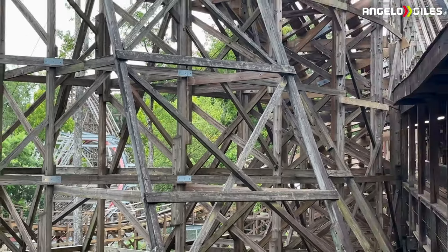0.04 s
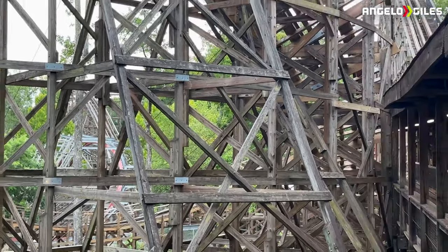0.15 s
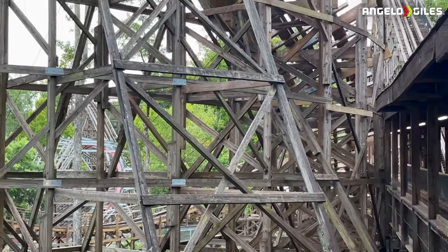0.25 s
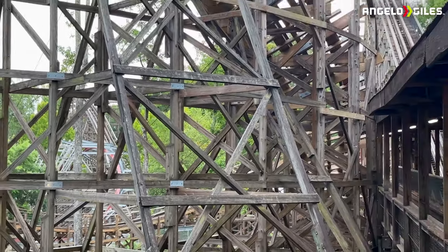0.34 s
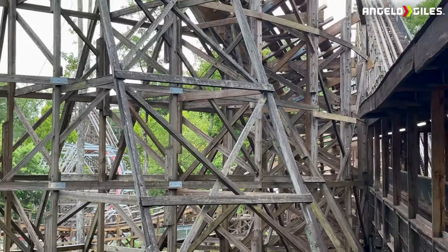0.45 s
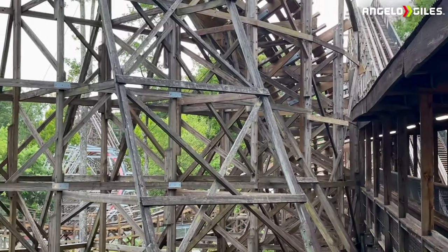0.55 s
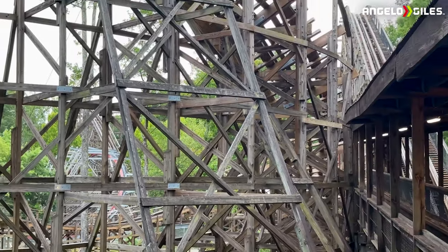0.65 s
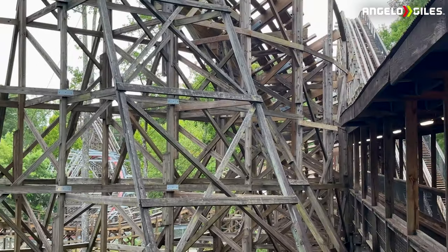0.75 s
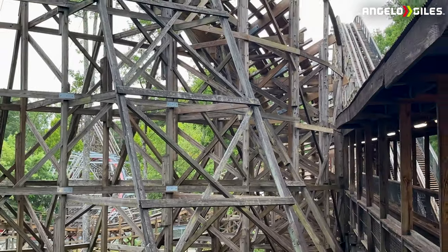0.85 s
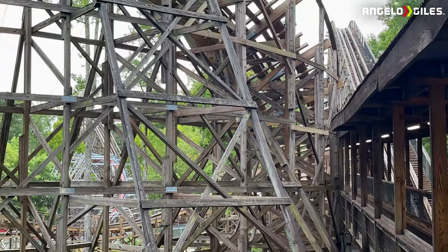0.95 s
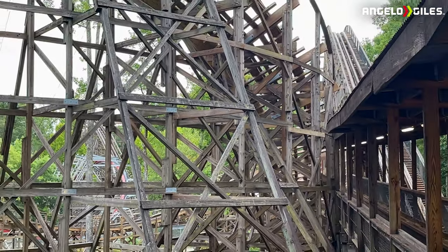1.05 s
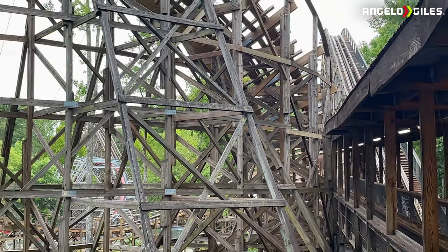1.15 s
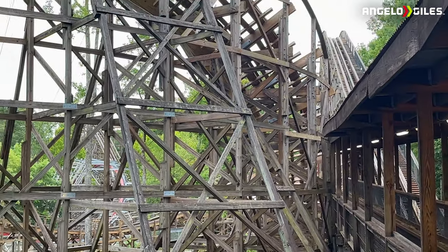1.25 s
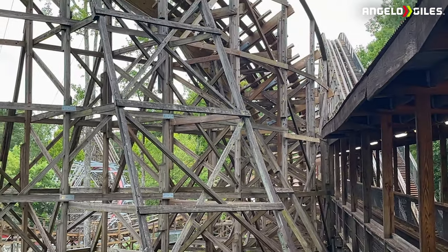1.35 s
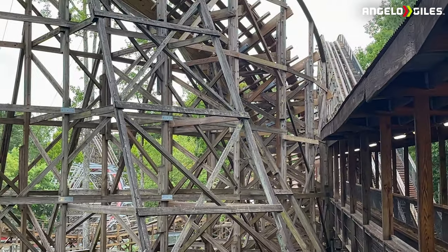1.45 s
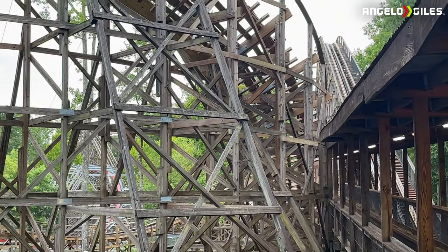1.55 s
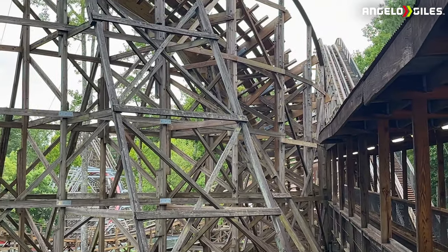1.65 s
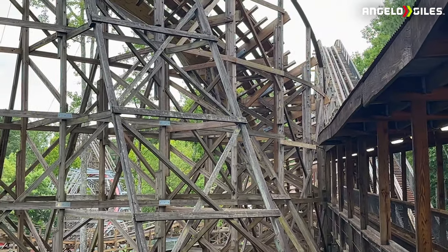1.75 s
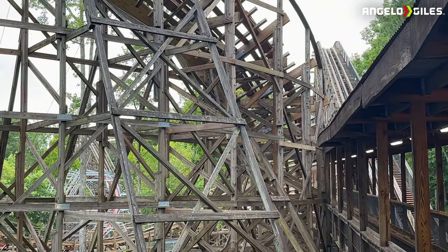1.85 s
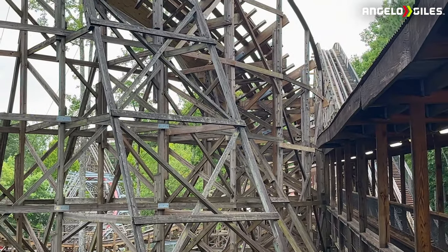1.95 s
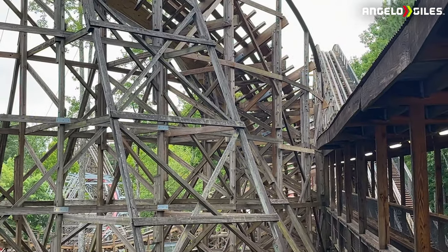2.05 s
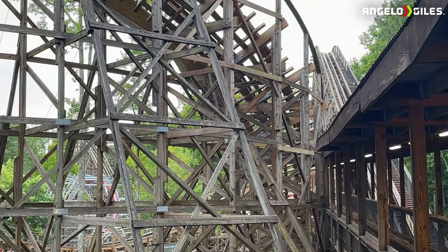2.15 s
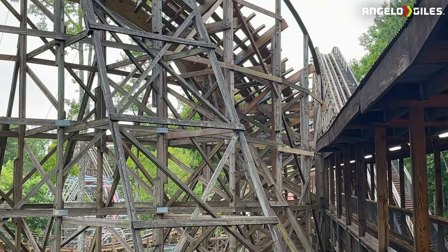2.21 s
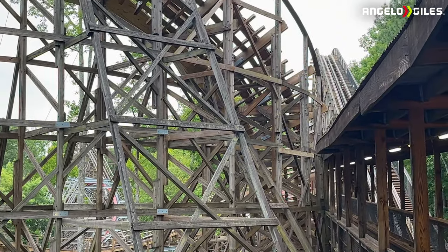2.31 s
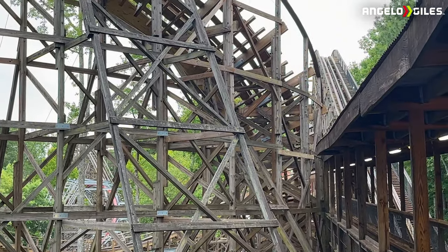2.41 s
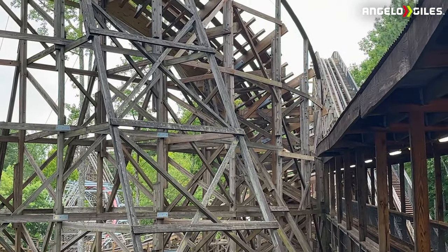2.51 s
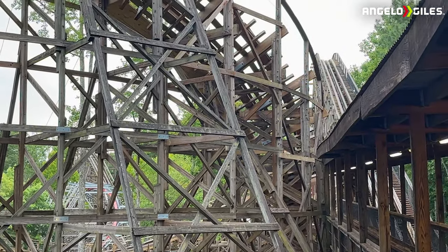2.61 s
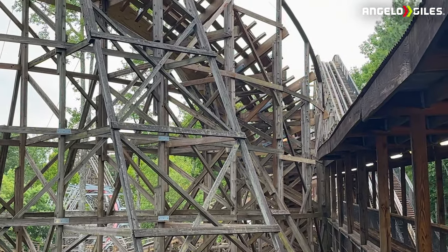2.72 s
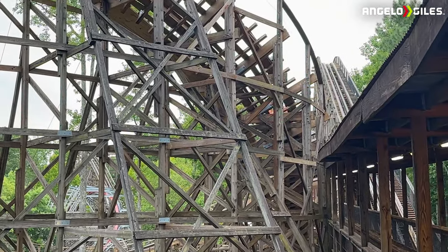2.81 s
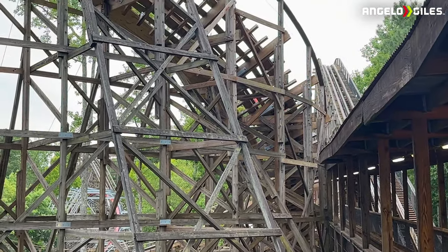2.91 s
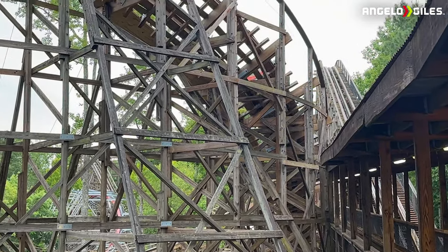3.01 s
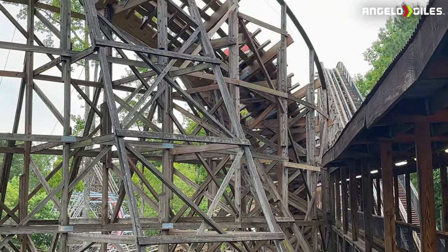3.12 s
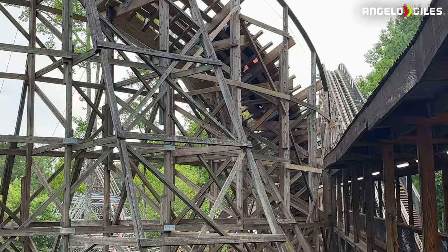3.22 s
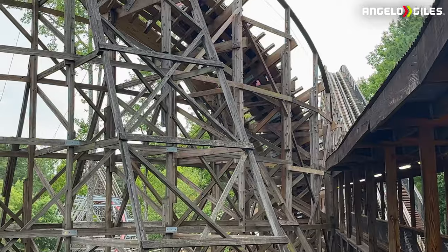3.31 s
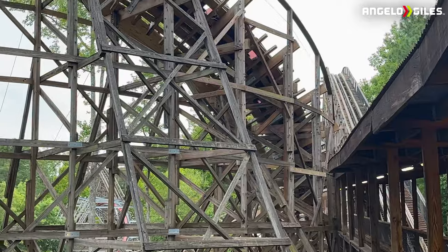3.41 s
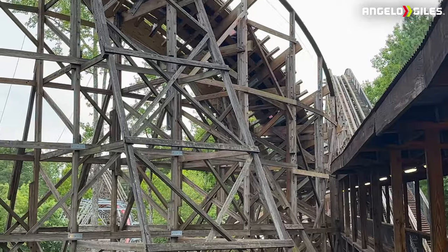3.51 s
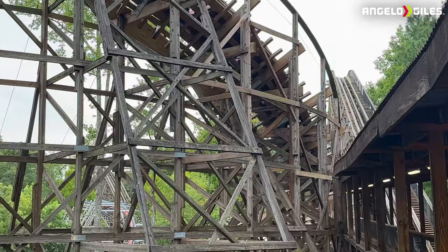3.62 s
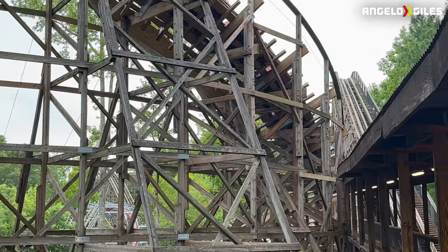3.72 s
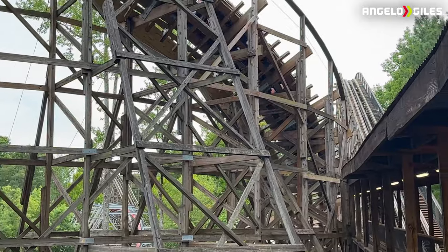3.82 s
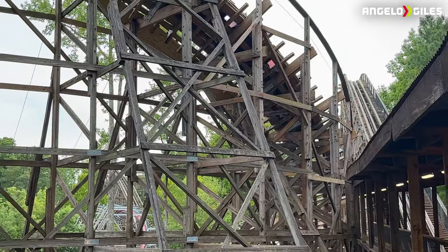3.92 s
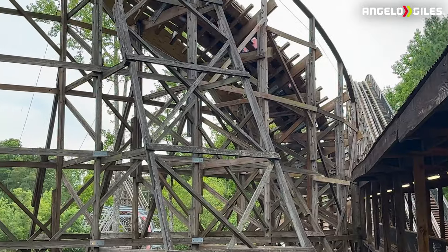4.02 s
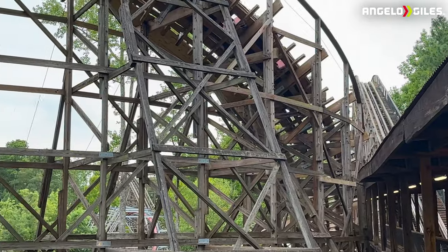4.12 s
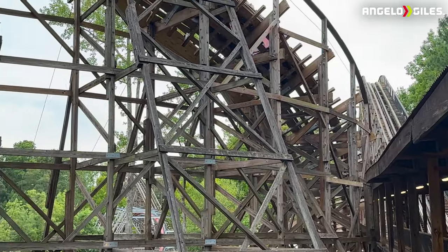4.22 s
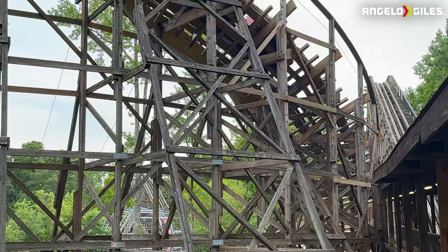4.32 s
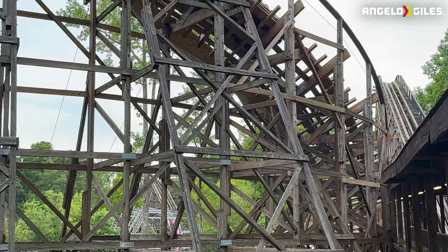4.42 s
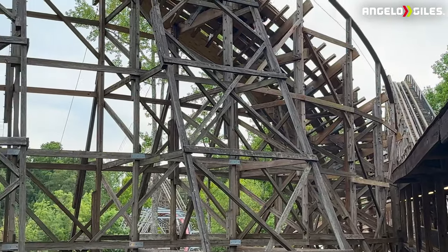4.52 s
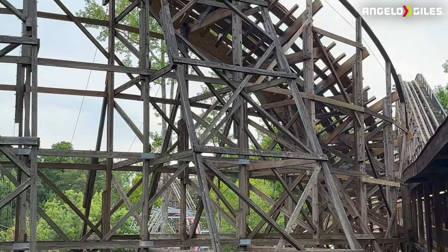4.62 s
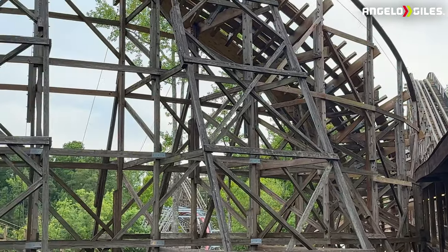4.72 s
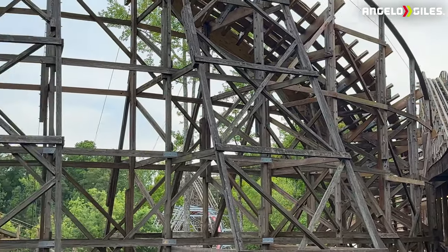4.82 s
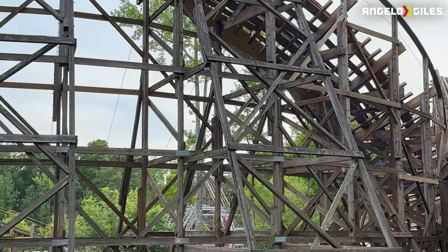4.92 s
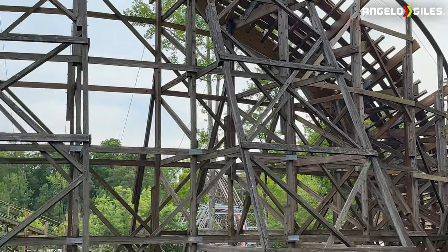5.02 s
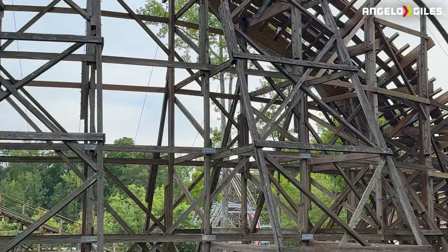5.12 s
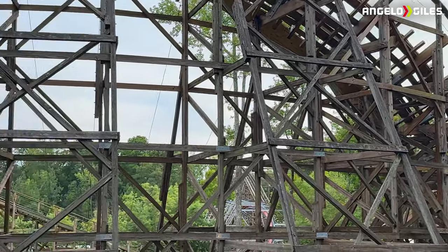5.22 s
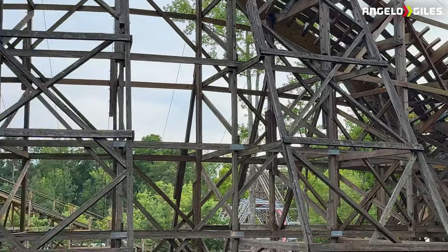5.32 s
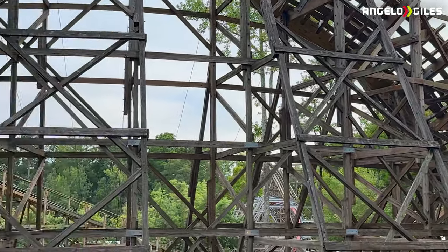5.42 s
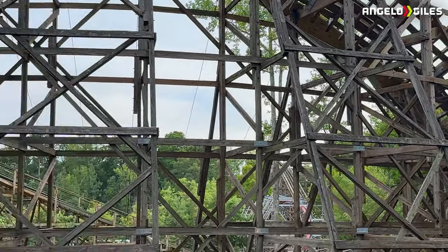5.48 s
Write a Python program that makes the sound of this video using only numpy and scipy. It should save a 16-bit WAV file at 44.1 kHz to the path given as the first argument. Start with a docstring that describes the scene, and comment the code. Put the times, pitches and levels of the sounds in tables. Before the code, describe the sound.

A roller coaster train rolls through a timber structure at an amusement park, heard from close by. Its deep rumble rises out of a soft background wash and a steady buzzing motor, growing into a bright roar with hollow wooden knocks. At the peak the wheels clatter sharply and squeal in brief bursts. The roar then falls back, with more thuds from the beams as the train moves away.

```python
"""A roller coaster train passes through a timber trestle. Rough steel wheels roar and hiss on the rails,
clack over the joints and squeal as their flanges rub in the bend; the shaken beams boom and thud.
A motor buzzes nearby over the low wash of the park. A phone follows the train,
and the stereo width varies with frequency."""
import sys
import numpy as np
from scipy import signal
from scipy.fft import rfft, irfft, next_fast_len
from scipy.io import wavfile
from scipy.ndimage import uniform_filter1d, map_coordinates

SR = 44100
rng = np.random.default_rng(int(sys.argv[2]) if len(sys.argv) > 2 else 0)


def inscribe(sig):
    """Save sig as 16-bit PCM at rate SR to the path in sys.argv[1].

    A 1-D sig is mono; a 2-D sig holds one channel per row.
    Samples are clipped to [-1, 1] before scaling.
    """
    pcm = np.round(np.clip(np.atleast_2d(sig).T, -1, 1) * 32767)
    wavfile.write(sys.argv[1], SR, pcm.astype(np.int16))


N = 244755
TIME = np.arange(N) / SR


def amp(db):
    return 10 ** (np.asarray(db) / 20)


def unit(x):
    return x / np.sqrt(np.mean(x ** 2) + 1e-20)


def along(points, hz, column=1):
    """One column of a table read on a log frequency axis."""
    table = np.transpose(points)
    return np.interp(np.log(hz + 1), np.log(table[0] + 1), table[column])


def curves(rows):
    """Automation: one value per sample for each column after the time."""
    times, *columns = np.transpose(rows)
    return [np.interp(TIME, times, column) for column in columns]


def wobble(rate):
    """A smooth random modulator, rate knots a second."""
    return map_coordinates(rng.standard_normal(int(N * rate / SR) + 4), [TIME * rate])


def filtered(x, response):
    """x through an EQ given as a complex response of frequency."""
    size = next_fast_len(N + 8192)
    return irfft(rfft(x, size) * response(np.fft.rfftfreq(size, 1 / SR)), size)[..., :N]


def rush(spectrum, patchy_db):
    """Two unrelated noises (direct and scattered sound) of rms 1, sharing patches of random gain."""
    bins = signal.stft(rng.standard_normal((2, N)), nperseg=512)[2]
    patches = uniform_filter1d(uniform_filter1d(rng.standard_normal(bins.shape[1:]), 6, 0), 10, 1)
    pair = signal.istft(bins * amp(patchy_db * unit(patches)), nperseg=512)[1][:, :N]
    low_hz, high_hz = spectrum[0][0], spectrum[-1][0]
    return unit(filtered(pair, lambda hz: amp(along(spectrum, hz)) * (hz > low_hz) * (hz < high_hz)))


# EQ of the park's deep bass and of its broad wash: f/Hz, level/dB
BASS_EQ = [(18, -40), (32, 0), (45, -12.5), (65, 2), (90, 3), (140, 1.5), (190, -7), (300, -23)]
WASH_EQ = [(90, -42), (200, -1.5), (450, -2.5), (900, -9), (1800, -15), (3500, -22), (7000, -26),
           (11000, -30.5), (13000, -37), (16000, -30)]
# Their fader rides: t/s, level/dB
BASS_LEVEL = [(0, -29), (.8, -27), (1.4, -32), (2, -28), (2.6, -28), (3.4, -26), (4.2, -31.5), (5.55, -35)]
WASH_LEVEL = [(0, -30), (.25, -30), (.5, -31.5), (1, -31), (3, -33), (5.55, -30.5)]
def park():
    """Distant rides, traffic and trees blur into a low bed."""
    bass = amp(curves(BASS_LEVEL)[0]) * rush(BASS_EQ, patchy_db=-0.8)
    wash = amp(curves(WASH_LEVEL)[0] + 0.21 * wobble(6.4)) * rush(WASH_EQ, patchy_db=0.6)
    return bass + wash


# Resonances of the motor casing: f/Hz, level/dB
CASING_EQ = [(50, 16), (120, -21), (300, -3.5), (440, -6), (528, 0), (600, -16), (704, 1), (790, 0.5),
             (900, -6.5), (1400, -8), (3000, -26), (6000, -48)]
# Hum lines: f/Hz, relative level/dB
HUM_LINES = [(88, -39.5), (118.5, -38), (147, -39)]
def motor(turn_hz=58.68):
    """A sharp pulse and a weaker one half a turn later ring the casing, over wavering hum lines."""
    turns = turn_hz * TIME + 0.013 * wobble(2.98)
    pulses = np.diff(np.floor(turns), prepend=0) + 0.36 * np.diff(np.floor(turns + .5), prepend=0)
    pulses *= amp(2.3 * wobble(30))
    buzz = unit(filtered(pulses, lambda hz: amp(along(CASING_EQ, hz)) * (hz > 40)))
    hum = 0
    for hz, db in HUM_LINES:
        gain = amp(db + 0.5 + 3.2 * wobble(5.19))
        hum += gain * np.sin(2 * np.pi * (hz * TIME + 0.16 * wobble(5)))
    return (amp(-38.5 + 1.1 * wobble(2.8)) * buzz + hum) * [[1], [.7]]


# Hollow timber hits under and behind the train: t/s, f/Hz, level/dB
THUDS = [(1.7, 320, -22), (2.05, 310, -19), (2.11, 315, -18), (2.265, 130, -17), (2.6, 290, -17),
         (2.73, 500, -19), (2.88, 115, -17), (3.365, 250, -15), (3.46, 255, -15), (3.49, 415, -16),
         (4.77, 385, -17), (4.805, 330, -18), (4.952, 310, -12), (5.015, 185, -14), (5.17, 180, -18),
         (5.185, 310, -19), (5.245, 345, -16), (5.3, 330, -20), (5.37, 300, -19), (5.39, 365, -18),
         (5.465, 160, -14), (5.525, 320, -16)]
def thuds(attack_s=.009, t60_s=.19):
    """Each thud is the soft, quickly damped ring of a beam."""
    out, t = np.zeros((2, N + SR)), np.arange(SR // 4) / SR
    for (start, hz, db), phase in zip(THUDS, rng.random((len(THUDS), 2, 1))):
        envelope = amp(db - 60 * t / t60_s) * (1 - np.exp(-t / attack_s))
        onset = round(start * SR)
        out[:, onset:onset + len(t)] += envelope * np.sin(2 * np.pi * (hz * t + phase))
    return out[:, :N]


def rubbed_mode(rows, width_hz, tone, attack_db_per_s=220, release_db_per_s=170):
    """A rubbed wheel mode: a gliding line of noise plus some pure tone, and its fluttering gain."""
    start, hold, from_hz, to_hz, db = np.transpose(rows)[:, :, None]
    ramps_db = np.minimum(attack_db_per_s * (TIME - start), release_db_per_s * (start + hold - TIME))
    envelope = amp(db + np.minimum(0, ramps_db)).max(axis=0)
    glide_times = np.hstack([start, start + hold]).ravel()
    pitch_hz = np.interp(TIME, glide_times, np.hstack([from_hz, to_hz]).ravel())
    fuzz = unit(filtered(rng.standard_normal((2, 2, N)), lambda hz: 1 / (1 + (2 * hz / width_hz) ** 3)))
    phase = 2 * np.pi * np.cumsum(pitch_hz + width_hz / 14 * wobble(30)) / SR
    line = unit((fuzz[0] + tone) * np.cos(phase) + fuzz[1] * np.sin(phase))
    return line, envelope * amp(0.48 * wobble(21))


# Squeals on the lowest and the second wheel mode: t/s, hold/s, from f/Hz, to f/Hz, level/dB
LOW_SQUEALS = [(1.61, 0.1, 2270, 2230, -44), (3.618, .035, 1924, 1930, -28), (3.705, 0.04, 1910, 1930, -30),
               (3.79, 0.125, 1940, 1890, -24), (3.974, 0.06, 1990, 1980, -28.5),
               (4.055, 0.06, 1915, 1885, -24.5), (4.13, .045, 1890, 1910, -27.5),
               (4.19, .04, 1870, 1860, -32), (4.362, 0.083, 1950, 1970, -34),
               (4.51, 0.14, 1980, 2010, -28.5), (4.7, .022, 2040, 2030, -26.5),
               (4.775, 0.03, 1960, 1930, -32), (5.121, .12, 1920, 1940, -40)]
HIGH_SQUEALS = [(3.83, .07, 4850, 4810, -36), (3.97, .05, 4860, 4860, -35.5), (4.05, .08, 4860, 4830, -31),
                (4.14, .1, 4860, 4850, -33), (4.27, .03, 4860, 4900, -37), (4.32, .02, 5000, 5000, -41),
                (4.38, .03, 5090, 5100, -43)]
# Top wheel modes: f/Hz, width/Hz, relative level/dB
TOP_MODES = [(8450, 220, -2), (12300, 1000, 0)]
def squeal():
    """Flanges rub the rail; the wheel's top modes add a sheen whenever the second one sounds."""
    low, low_gain = rubbed_mode(LOW_SQUEALS, width_hz=170, tone=.75)
    high, high_gain = rubbed_mode(HIGH_SQUEALS, width_hz=310, tone=0)
    peaks = lambda f: sum(amp(db) / (1 + abs(2 * (f - hz) / width) ** 3) for hz, width, db in TOP_MODES)
    sheen = unit(filtered(rng.standard_normal((2, N)), peaks))
    return low_gain * low + high_gain * (high + amp(-18) * sheen)


# The hardest wheel hits on rail joints: t/s, level/dB
HARD_CLACKS = [(2.8512, -34), (2.9345, -28), (2.9869, -27), (3.105, -24), (3.345, -24), (3.4194, -20),
               (3.5002, -30), (3.5451, -19), (3.5816, -25), (3.6215, -21), (3.6599, -18), (3.7452, -23),
               (3.827, -20), (3.9715, -24), (4.0016, -22), (4.041, -23), (4.1906, -26), (4.2226, -23),
               (4.7918, -33), (5.1779, -30)]
def clacks(roar_db, axle_gap_s=.0815, attack_s=0.0028, t60_s=0.091):
    """Joints give blurred bursts of rail hiss; axle after axle ticks softly between the hard hits."""
    envelope, t = np.zeros(N + SR), np.arange(SR // 10) / SR
    time_jitter, level_jitter = rng.standard_normal((2, 100))
    soft_times = np.clip(1 + axle_gap_s * np.arange(100) + 0.012 * time_jitter, 0, N / SR)
    soft_db = np.interp(soft_times, TIME, roar_db) - 10.5 + 2.5 * level_jitter
    for start, db in [*HARD_CLACKS, *zip(soft_times, soft_db)]:
        envelope[round(start * SR):][:len(t)] += amp(db - 60 * t / t60_s) * (1 - np.exp(-t / attack_s))
    return envelope[:N] * rush(HISS_EQ, patchy_db=2.5)


# Body of the timber trestle: f/Hz, level/dB
BEAM_EQ = [(30, -38), (70, -33), (105, -26), (120, -0.5), (138, -3), (180, -1), (240, -1.5), (330, -0.5),
           (430, -1.5), (540, -7), (900, -17.5)]
# Low-shelf ride, how far the long beams stand out: t/s, level/dB
LONG_BEAM_LEVEL = [(1, 3), (1.5, -1), (2.1, 0), (2.6, 0.5), (3, -1), (3.3, -4.5), (3.7, 1), (4.2, 0),
                   (4.7, 4.5), (5.55, 1)]
def trestle_boom(boom_db, shelf_hz=215):
    """The rolling train shakes the beams into a boom; the long ones carry its low end."""
    boom = amp(boom_db + 0.42 * wobble(5.38)) * rush(BEAM_EQ, patchy_db=-0.77)
    low_end = filtered(boom, lambda hz: 1 / (1 + (hz / shelf_hz) ** 6))
    return boom + (amp(curves(LONG_BEAM_LEVEL)[0]) - 1) * low_end


# EQ of the wheel roar, the rail hiss and the sizzle on top: f/Hz, level/dB
ROAR_EQ = [(220, -14), (400, -12), (490, 0), (620, -1), (900, -0.5), (1300, -6), (2500, -13), (4000, -21.5),
           (6500, -34)]
HISS_EQ = [(1200, -7), (2600, -1), (4000, -5.5), (5500, -9.5), (8000, -13), (10000, -17), (16000, -33)]
SIZZLE_EQ = [(6000, -31), (9000, -5), (10200, 1.5), (11300, 6.5), (12500, 2), (14000, 0.5), (16000, -2)]
# Fader ride of the sizzle: t/s, level/dB
SIZZLE_LEVEL = [(1.5, -68), (2.5, -60), (2.75, -51), (3.1, -46.5), (3.55, -36.5), (3.75, -41.5),
                (3.95, -42), (4.1, -43), (4.3, -43.5), (4.7, -50), (5.55, -55)]
def rolling_wheels(roar_db, nearest_roar_db=-18.5, nearest_hiss_db=-27):
    """Rough wheels on rough rails roar, hiss and sizzle; loose parts shake all three together."""
    hiss_db = nearest_hiss_db + 1.115 * (roar_db - nearest_roar_db)  # brighter up close
    sizzle_db, = curves(SIZZLE_LEVEL)
    shake = wobble(24.28) + .5 * wobble(12)
    roar = amp(roar_db + 0.6 * shake) * rush(ROAR_EQ, patchy_db=0.1)
    hiss = amp(hiss_db + .7 * shake + .4 * wobble(7)) * rush(HISS_EQ, patchy_db=1.1)
    sizzle = amp(sizzle_db + .9 * shake + .8 * wobble(9)) * rush(SIZZLE_EQ, patchy_db=1.6)
    return roar + hiss + sizzle


# Fader rides of the pass-by: t/s, boom level/dB, roar level/dB
PASS_BY = [(0.8, -59, -39.5), (1.1, -42, -43), (1.5, -32, -35), (1.8, -28, -32), (2.1, -24, -30.5),
           (2.5, -23.5, -28), (2.75, -21, -25), (3.1, -20.5, -22), (3.28, -19.5, -20), (3.45, -17.5, -18.5),
           (3.6, -20, -19), (3.75, -20.5, -19), (4.0, -22, -19.5), (4.4, -24, -21.5), (4.8, -26, -23.5),
           (5.15, -26, -26), (5.35, -27, -26), (5.55, -27.5, -29.5)]
def train(fade_in_s=0.72):
    """Timber and steel swell as the train nears and ease off as it leaves."""
    boom_db, roar_db = curves(PASS_BY)
    entry_s = PASS_BY[0][0]
    fade_in = np.interp(TIME, [entry_s - fade_in_s, entry_s], [0, 1])
    return fade_in * (trestle_boom(boom_db) + rolling_wheels(roar_db)) + clacks(roar_db)


# Stereo width by frequency: f/Hz, width/rad (0 is centred, pi is side only)
WIDTH = [(45, 0.12), (140, 0.24), (400, 0.43), (800, 0.68), (1300, 0.51), (2200, 0), (2900, 0.56),
         (4500, 0.58), (5350, 0), (6600, 0), (7300, 1.3), (7900, 3.15), (8550, 3.15), (9500, 1.34),
         (10500, 0.85), (11150, 0), (12900, 0), (13900, 1.24), (15500, 1.94)]
# How much of the side follows the mid: f/Hz, share in phase, share a quarter cycle off
SIDE_TIE = [(60, 0.39, 0), (200, 0.63, -0.24), (500, 0.2, -0.48), (1600, 0.23, -0.53), (2200, 0.056, 0.35),
            (2800, 0, 0.79), (11000, 0.033, .8), (13000, 0, -.6), (16000, 0, -.7)]
def stereo_image(field):
    """Mid/side width by frequency: centred at 5.4-6.6 and 11-13 kHz, side only near 8 kHz."""
    half_angle = lambda hz: np.clip(along(WIDTH, hz), 0, np.pi) / 2
    tied = lambda hz: along(SIDE_TIE, hz) + 1j * along(SIDE_TIE, hz, column=2)
    free = lambda hz: np.sqrt(np.clip(1 - abs(tied(hz)) ** 2, 0, 1))
    mid = filtered(field[0], lambda hz: np.cos(half_angle(hz)))
    side = filtered(field, lambda hz: np.sin(half_angle(hz)) * np.array([tied(hz), free(hz)])).sum(0)
    return np.array([mid + side, mid - side])


# Pan ride: t/s, left-over-right level/dB
PAN = [(0, 0), (2.2, 0), (3.3, -.5), (4.2, -0.3), (4.8, .2), (5.55, .8)]
def phone_turn(pair, shelf_hz=1500):
    """The phone follows the train, tipping the balance of the lows and mids."""
    lean_db, = curves(PAN)
    lows = filtered(pair, lambda hz: 1 / (1 + (hz / shelf_hz) ** 4))
    return pair + (amp([lean_db / 2, -lean_db / 2]) - 1) * lows


def scene():
    """All layers, from park bed to train, spread in stereo and panned."""
    return phone_turn(stereo_image(park() + motor() + thuds() + squeal() + train()))


def record(dry, top_hz=15750):
    """The phone keeps nothing above its band limit."""
    return filtered(dry, lambda hz: hz < top_hz)


dry = scene()
out = record(dry)
inscribe(out)
```